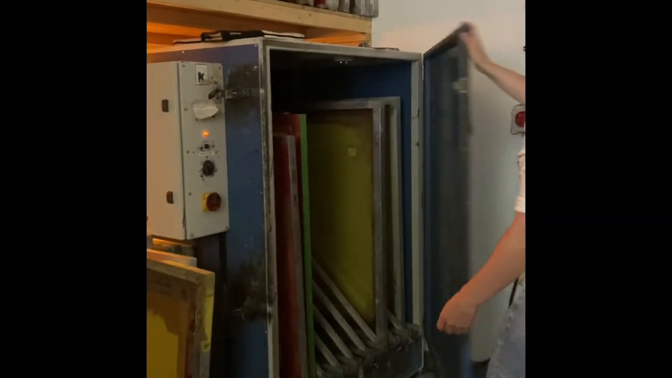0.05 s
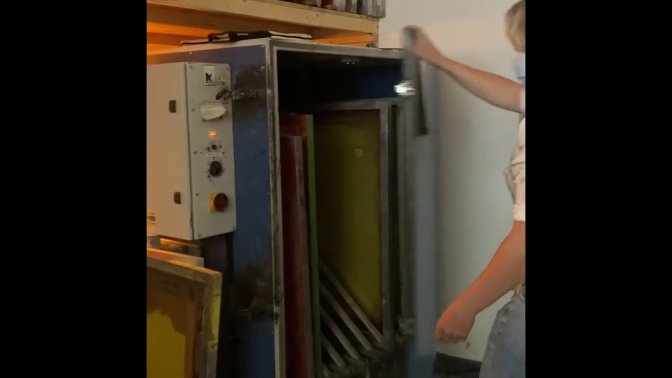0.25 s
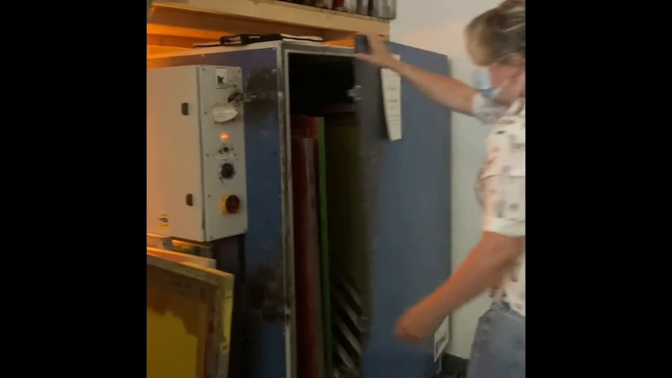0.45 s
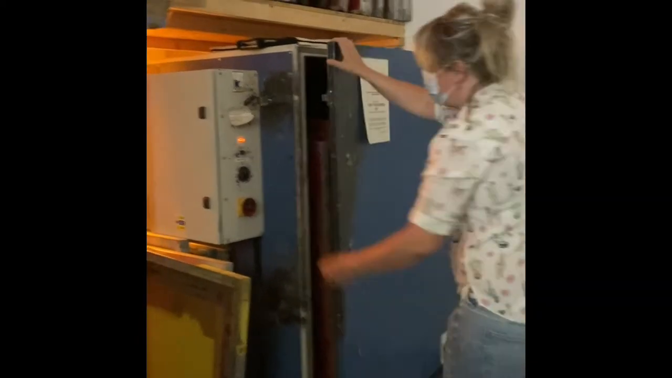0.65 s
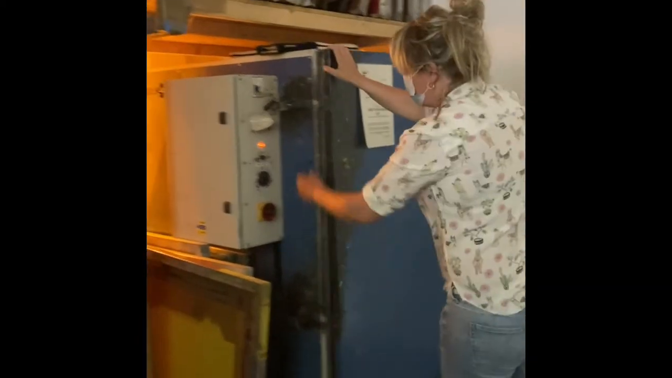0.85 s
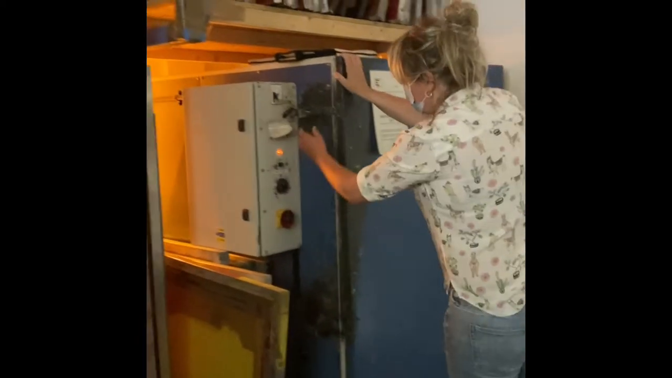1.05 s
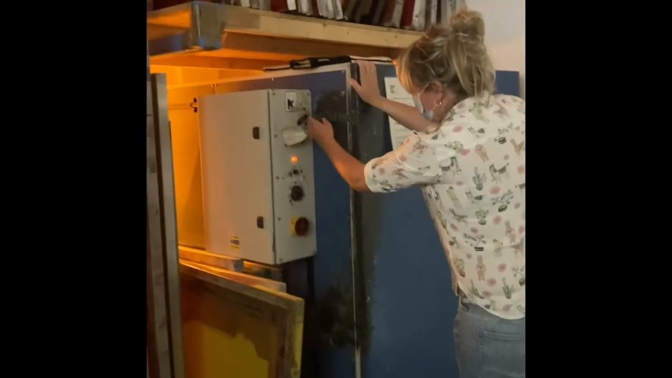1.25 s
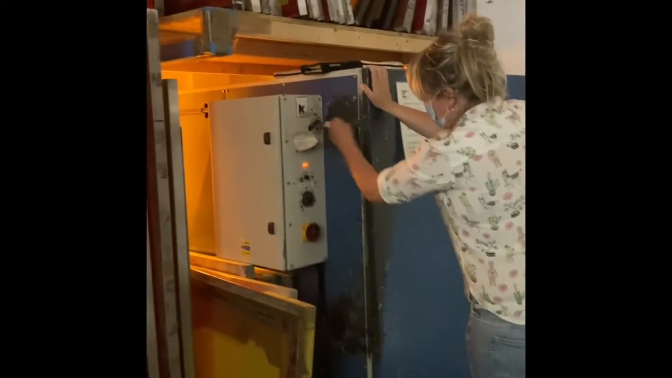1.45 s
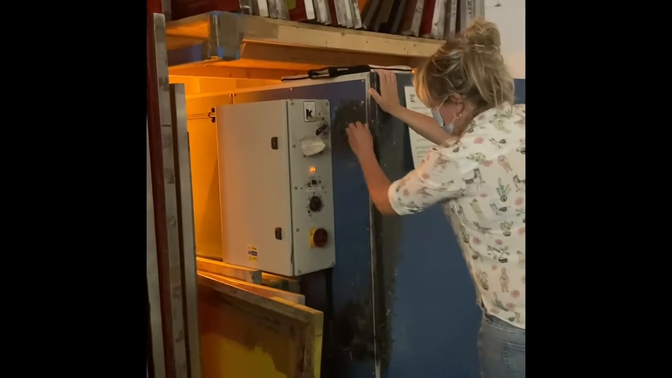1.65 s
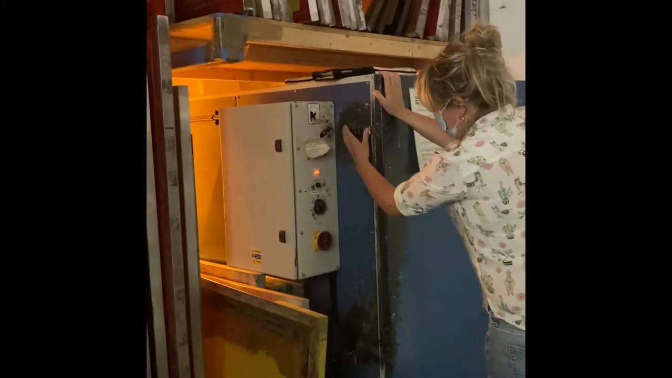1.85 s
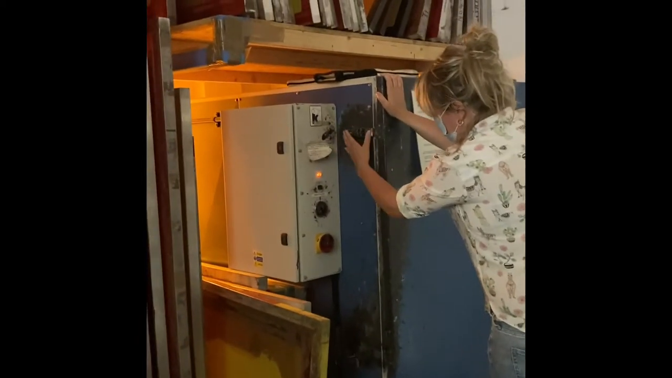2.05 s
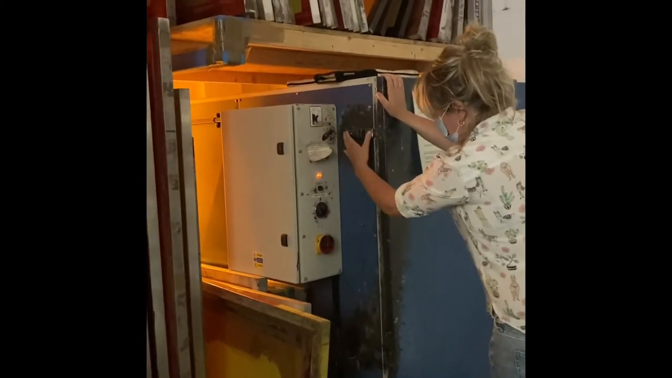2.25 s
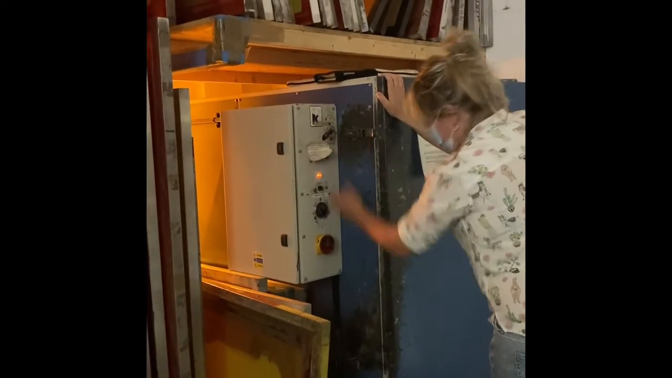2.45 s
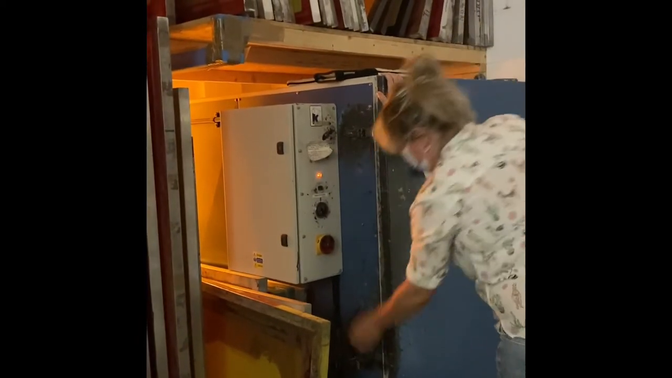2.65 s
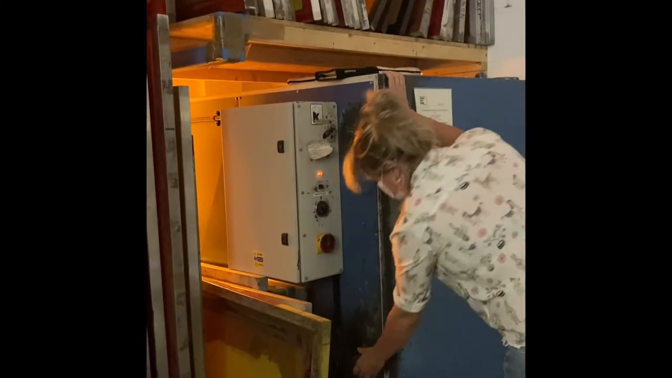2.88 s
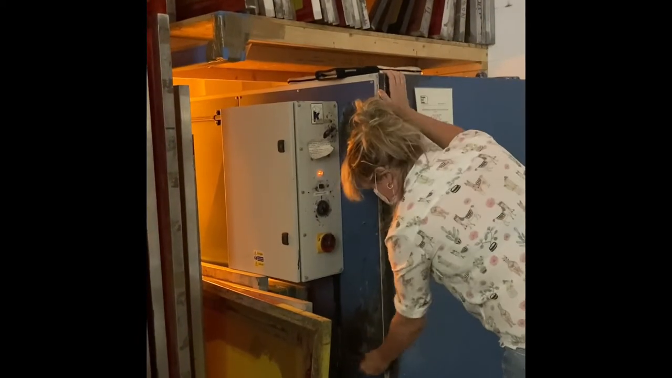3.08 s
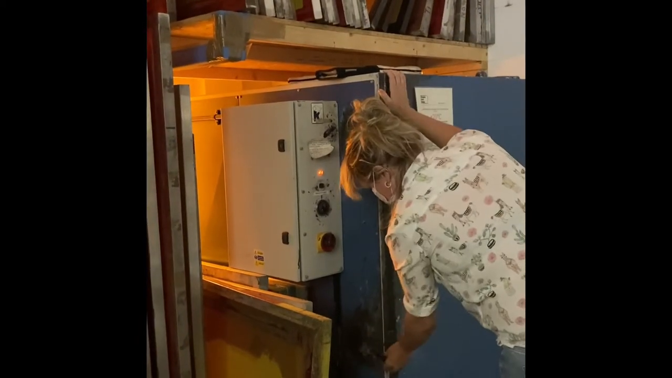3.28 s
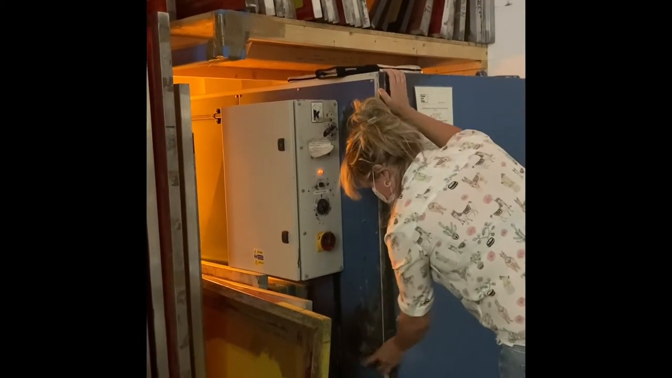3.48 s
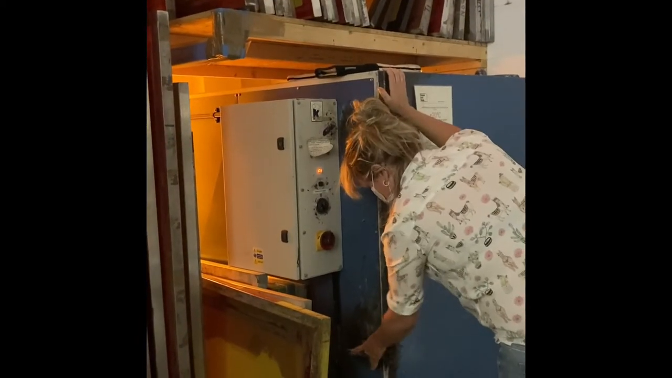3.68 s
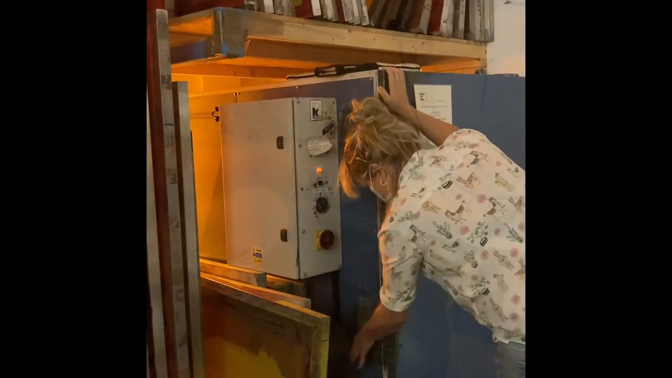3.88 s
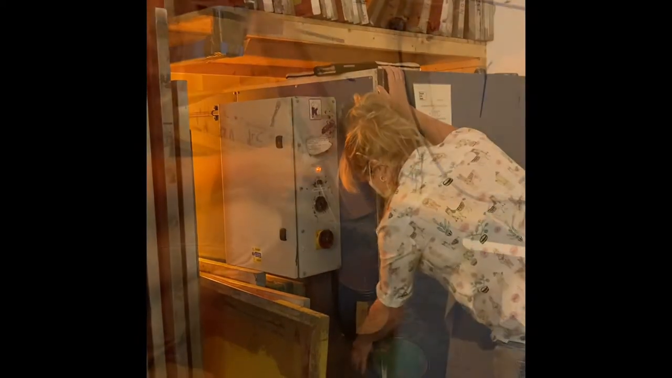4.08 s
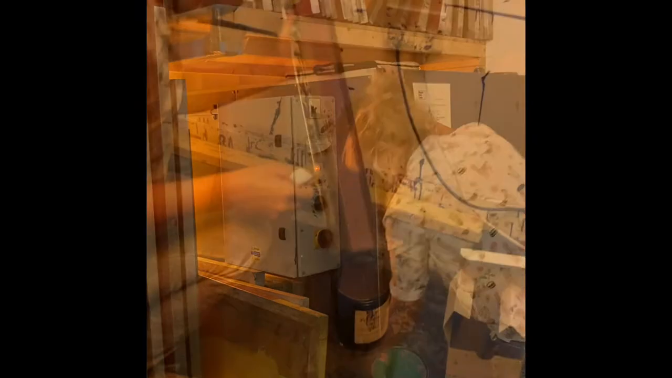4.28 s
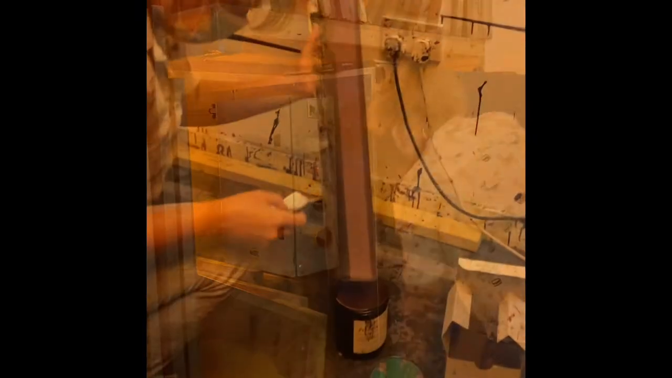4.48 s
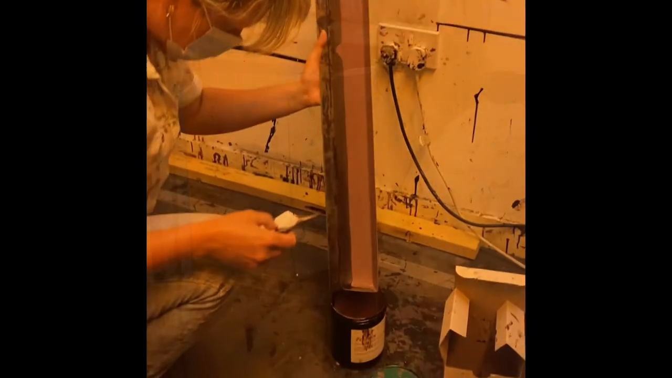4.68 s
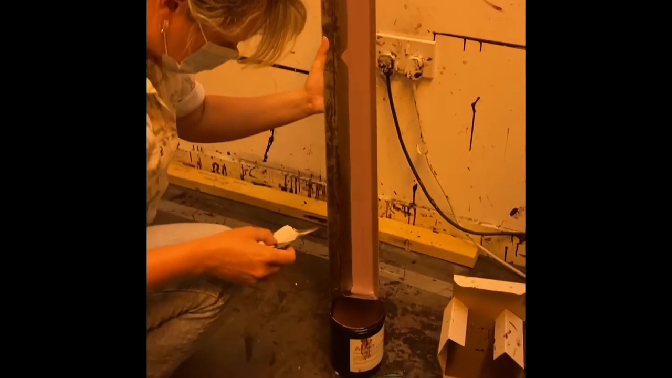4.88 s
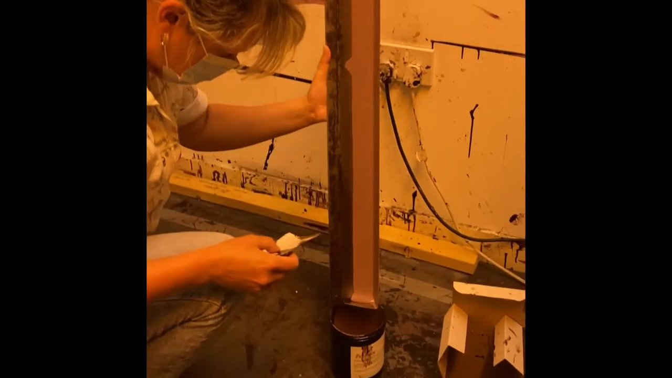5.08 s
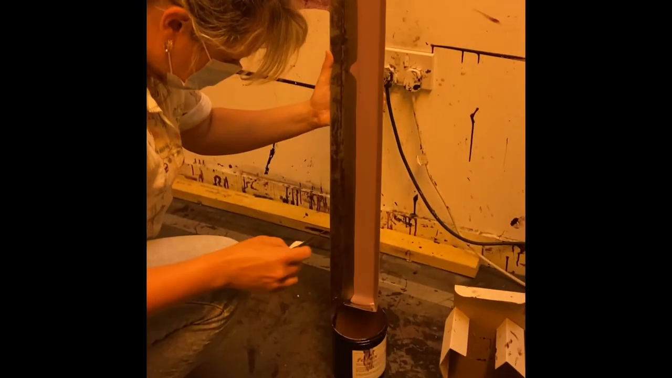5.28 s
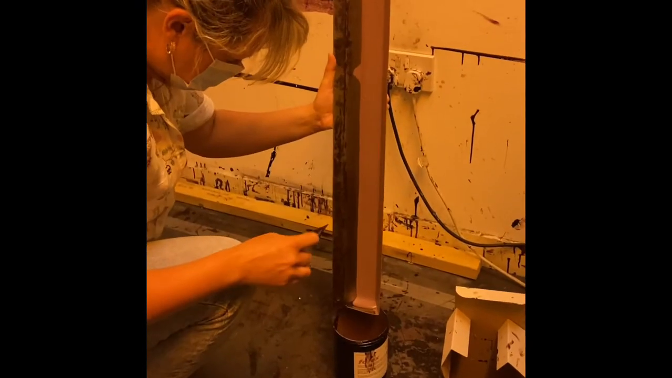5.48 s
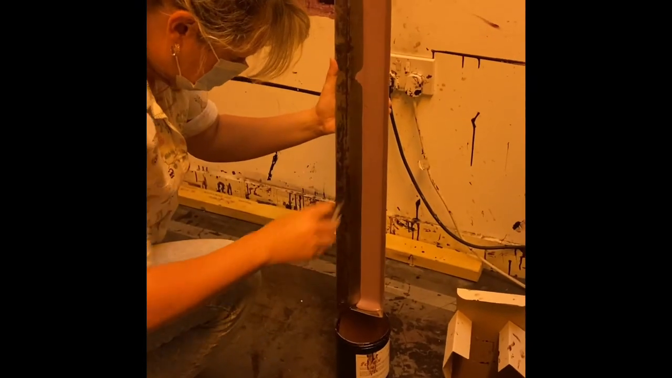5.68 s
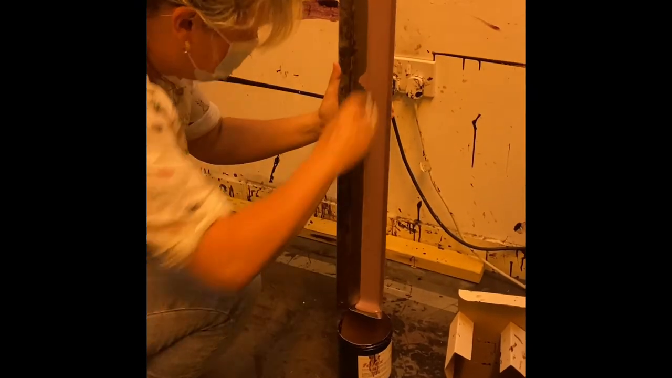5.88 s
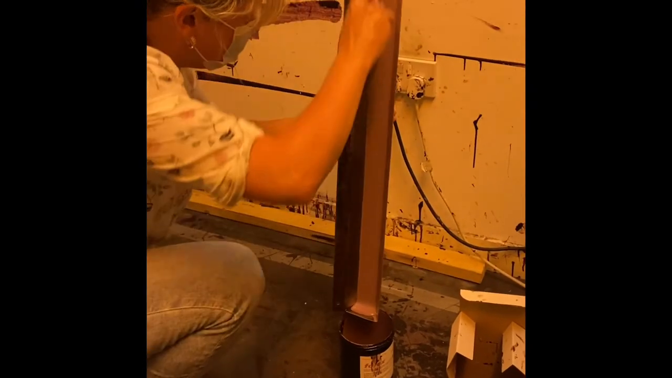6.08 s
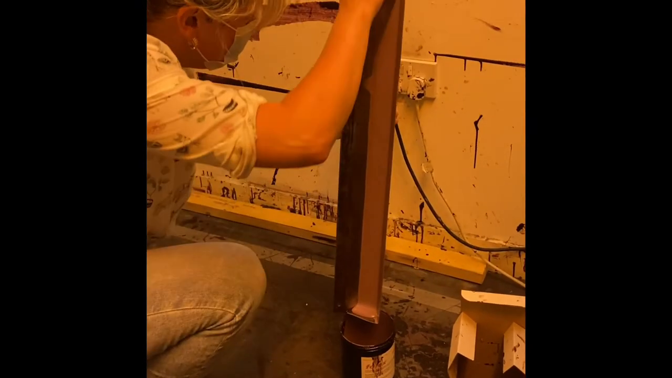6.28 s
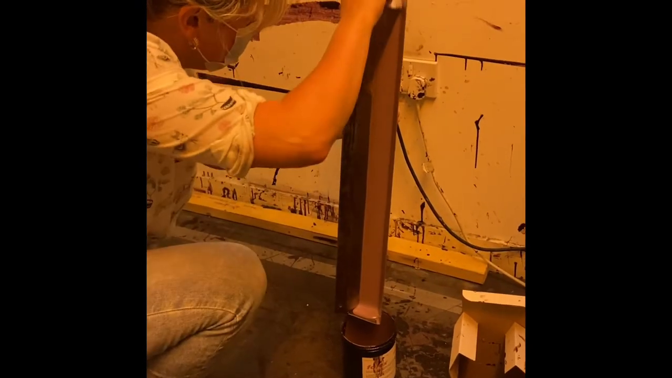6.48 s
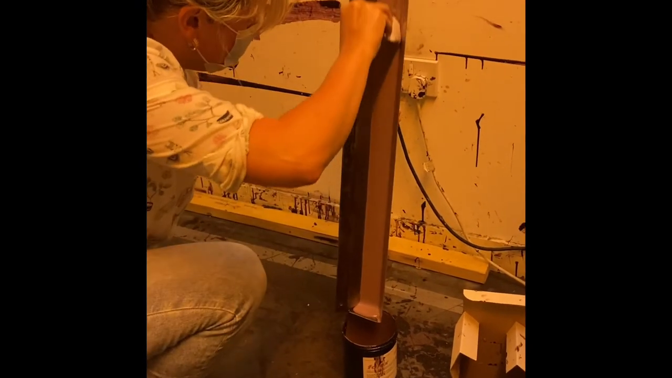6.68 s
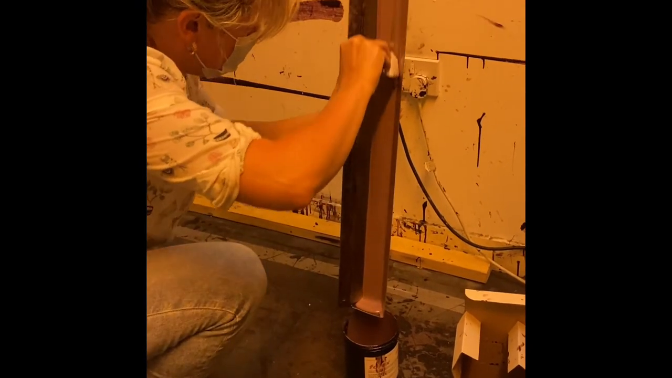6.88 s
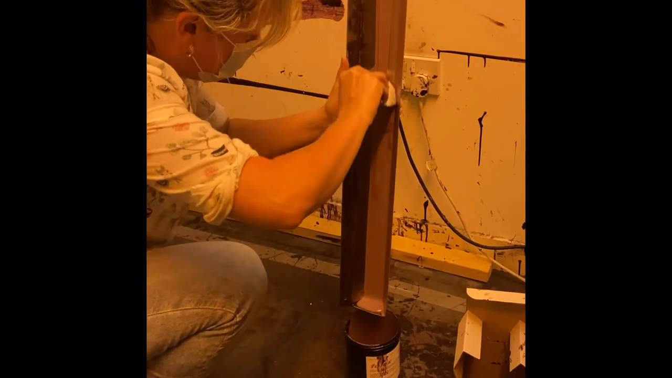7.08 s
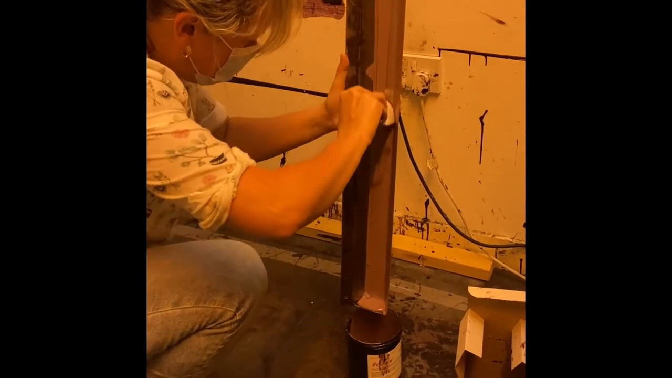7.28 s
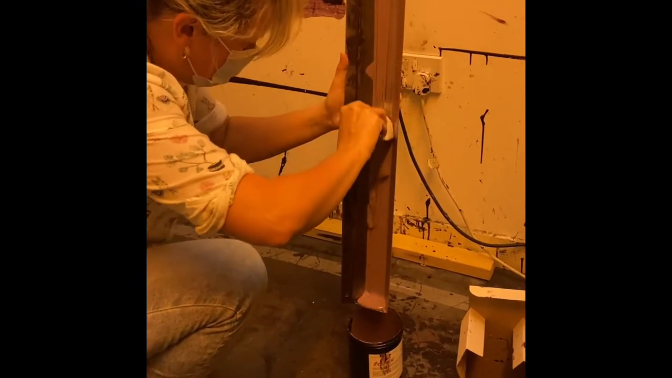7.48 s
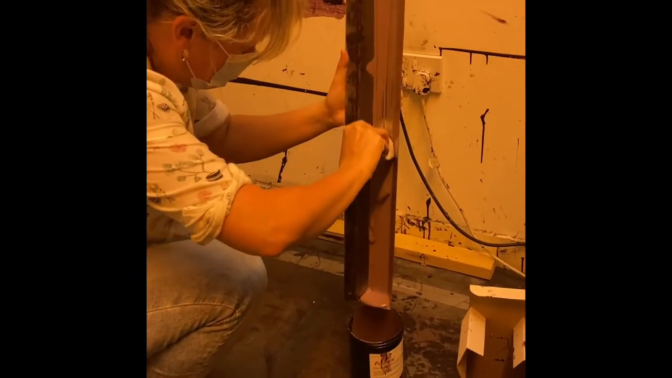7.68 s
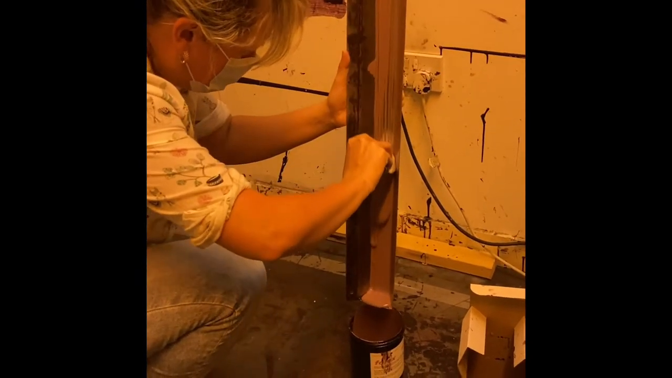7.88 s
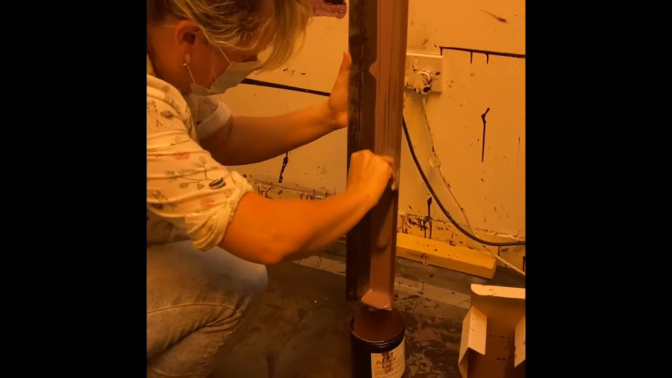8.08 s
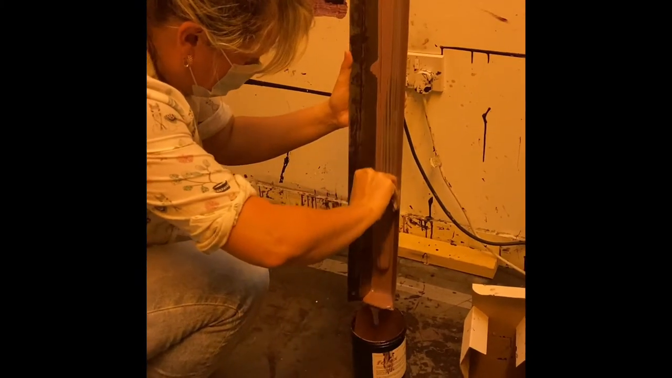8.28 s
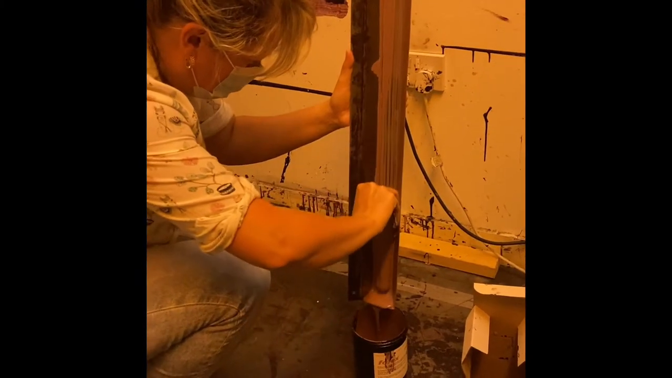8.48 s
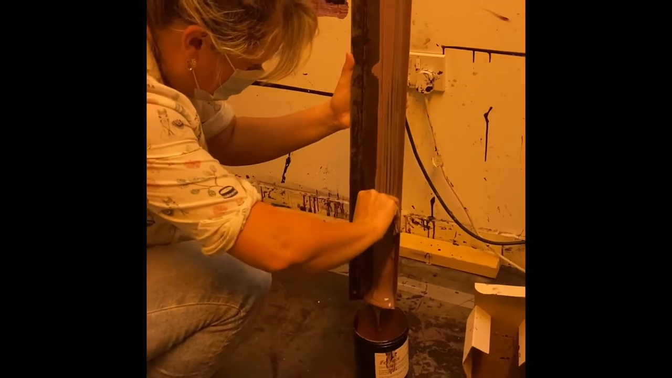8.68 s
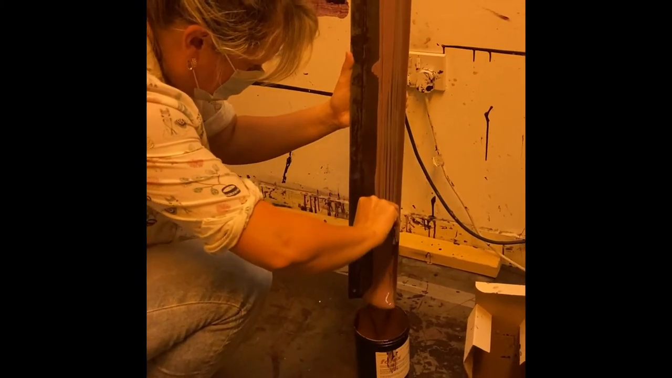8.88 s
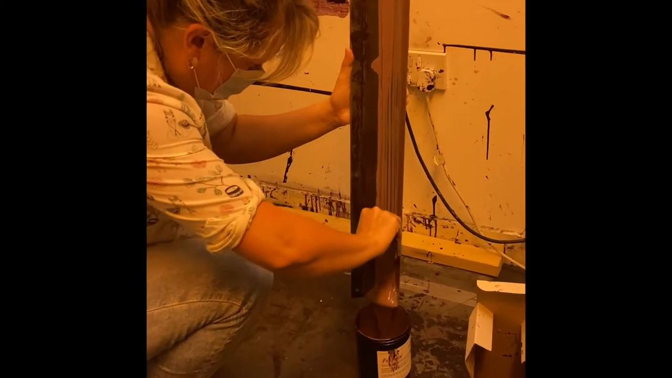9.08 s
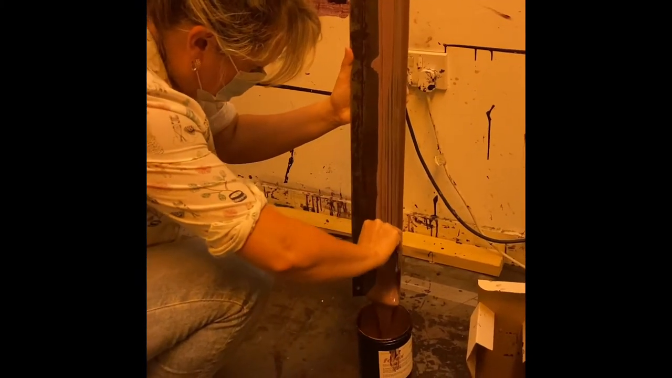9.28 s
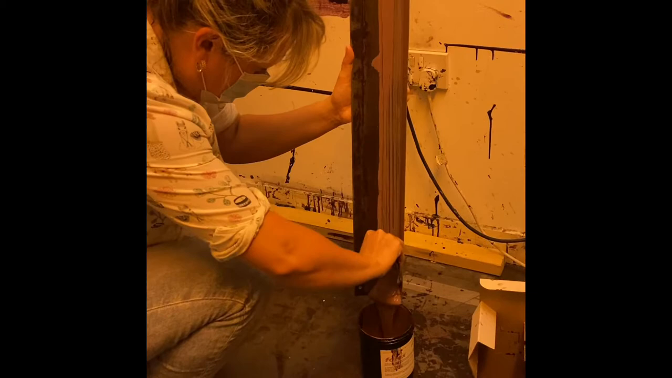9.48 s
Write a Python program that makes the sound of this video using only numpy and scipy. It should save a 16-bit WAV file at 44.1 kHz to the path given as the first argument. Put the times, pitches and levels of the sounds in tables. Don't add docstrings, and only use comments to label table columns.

```python
import sys
import numpy as np
from scipy import signal
from scipy.fft import rfft, irfft, next_fast_len
from scipy.io import wavfile
from scipy.ndimage import uniform_filter1d

SR = 44100
rng = np.random.default_rng(int(sys.argv[2]) if len(sys.argv) > 2 else 0)


def transcribe(u):
    v = np.clip(np.atleast_2d(u).T, -1, 1)
    q = np.round(v * 32767).astype(np.int16)
    wavfile.write(sys.argv[1], SR, q)


def magnitude_from_level(level_db):
    exponent = np.asarray(level_db, float) / 20
    return 10 ** exponent


N = 420713
T = np.arange(N) / SR
SIZE = next_fast_len(N + SR, real=True)
HZ = np.maximum(np.arange(SIZE // 2 + 1) * SR / SIZE, 1)
DISSOLVE_S, DISSOLVE_LENGTH_S = 3.97, 0.85

# [start_s, hiss_db]
SWING = [
    (0.0, -28.5),
    (0.18, -35.5),
    (0.316, -30),
    (0.6, -31),
    (0.664, -31),
    (0.7, -33.5),
    (0.89, -36.5),
    (0.954, -37.5),
    (1.0, -50),
]
# [start_s, clack_db, hook_db, plate_db]
LOWER_LATCH = [
    (3.2488, -9.5, -24.5, -53),
    (3.2528, -8, -33, -35),
    (3.445, -23.5, -39.5, -51.5),
    (3.485, -25.5, -53, -38),
    (3.515, -42, -53, -37.5),
    (3.795, -12, -32, -22.5),
]
# [pitch_hz, likeness_0_to_1]
LIKENESS = [(100, .98), (250, .9), (400, .45), (600, .78), (1000, .78), (1600, .38), (2500, .25),
            (3500, .4), (4500, .6), (5300, .94), (5900, .92), (6500, .78), (7500, .85), (9000, .96),
            (11700, .97), (15500, .8)]
# [pitch_hz, lead_rad]
LEAD = [(0, 0), (300, .2), (520, -2.7), (2100, -1.8), (2840, -3.4), (5600, -3.1), (7300, -1.3), (7670, -.2),
        (8870, .1), (11200, 2.9), (12300, 3.3), (14100, 6.1), (16500, 6.2)]
# [pitch_hz, lean_db]
LEAN = [(60, 1.5), (150, 9), (380, 8), (950, -1), (2380, -0.5), (5980, 1), (15000, 0.5)]
FIRST = (LIKENESS, LEAD, LEAN)


def in_time(rows):
    s, *columns = np.transpose(rows)
    return [np.interp(T, s, column) for column in columns]


def at_hz(points, hz=HZ):
    f, v = np.transpose(points)
    return np.interp(np.log(hz), np.log(np.maximum(f, 1)), v)


def drift(rate):
    count = int(N / SR * rate) + 2
    return np.interp(T * rate, np.arange(count), rng.standard_normal(count))


def gate(start, end, edge):
    return np.clip(np.minimum(T - start, end - T) / edge, 0, 1)


def ring(clicks, hz, t60):
    r = magnitude_from_level(-60 / (t60 * SR))
    w = 2 * np.pi * hz / SR
    return signal.lfilter([0, np.sin(w)], [1, -2 * r * np.cos(w), r * r], clicks + 1e-18)


def ports(pair, room, colour_db=0):
    likeness, lead, lean = room
    lead_hz, lead_rad = np.transpose(lead)
    alike = at_hz(likeness)
    same = np.sqrt((1 + alike) / 2) * pair[0]
    apart = np.sqrt((1 - alike) / 2) * pair[1]
    turn = magnitude_from_level(at_hz(lean) / 2) * np.exp(.5j * np.interp(HZ, lead_hz, lead_rad))
    both = np.array([(same + apart) * turn, (same - apart) / turn])
    return irfft(magnitude_from_level(colour_db) * both, SIZE)[:, :N]


def air(spectrum, room):
    real, imaginary = rng.standard_normal((2, 2, len(HZ)))
    both = ports(real + 1j * imaginary, room, at_hz(spectrum))
    return both / np.std(both.mean(0))


def slips(rows, tone, wobble):
    glide = []
    for start, end, first_hz, last_hz, _ in rows:
        glide += [(start, first_hz), (end, last_hz)]
    hz, = in_time(glide)
    on = (T > rows[0][0]) & (T < rows[-1][1])
    phase = 2 * np.pi * np.cumsum((hz * (1 + wobble * drift(60)))[on]) / SR
    out = np.zeros(N)
    out[on] = sum(magnitude_from_level(db + 1.6 * drift(23.8)[on]) * np.sin(k * phase) for k, db in tone)
    return out * sum(magnitude_from_level(db) * gate(start, end, 0.016) for start, end, _, _, db in rows)


def fan(levels, low, high, room, patchy_db):
    rumble_db, air_db, hum_db = levels
    mains_hz, blade_hz, blade_db = 100, 212.6, -10.5
    rumble = magnitude_from_level(rumble_db + patchy_db * drift(7)) * air(low, room)
    hiss = magnitude_from_level(air_db + patchy_db * drift(7.1)) * air(high, room)
    blade = magnitude_from_level(blade_db + 1.5 * drift(6.6)) * np.sin(2 * np.pi * blade_hz * T + 0.17 * drift(3.7))
    hum = np.sqrt(2) * magnitude_from_level(hum_db) * (np.sin(2 * np.pi * mains_hz * T) + blade)
    return rumble + hiss + hum * magnitude_from_level(at_hz(room[2], 110) / 2 * np.array([[1], [-1]]))


def gap_whistle():
    # [start_s, pitch_hz]
    gap_pitch = [
        (0.0, 8680),
        (0.28, 8430),
        (0.598, 9400),
        (1.0, 8670),
    ]
    low_pass = signal.butter(2, 400, fs=SR, output="sos")
    narrow = signal.sosfilt(low_pass, rng.standard_normal((2, N)))
    phase = 2 * np.pi * np.cumsum(in_time(gap_pitch)[0]) / SR
    band = narrow[0] * np.cos(phase) + narrow[1] * np.sin(phase)
    return band / np.std(band)


def swing():
    # [pitch_hz, level_db]
    seal_colour = [(3600, -9.5), (5000, -11.5), (6500, -4.5), (7500, -3.5), (8700, 0), (10500, 0.5),
                   (12000, -0.5), (14500, -8.5), (16000, -31.5)]
    # [pitch_hz, level_db]
    scrape_colour = [(300, -35.5), (600, -18), (1000, -6.5), (1500, -7.5), (2100, -6.5), (2800, 2),
                     (3050, -2.5), (3400, -21), (4300, -2.5), (5000, -21), (7000, -41)]
    # [pitch_hz, likeness_0_to_1]
    seal_likeness = [(100, .98), (3000, .3), (4200, .65), (5000, .95), (6000, .98), (6600, .8),
                     (11700, .98), (15500, .8)]
    # [start_s, level_db, length_s]
    finger_rubs = [
        (1.195, -67, .03),
        (1.329, -62, .02),
        (1.417, -56.5, .1),
        (1.528, -48, .02),
        (1.545, -46.5, 0.01),
    ]
    room = (seal_likeness, LEAD, LEAN)
    rubs = sum(magnitude_from_level(db) * gate(s, s + length, .008) for s, db, length in finger_rubs)

    hiss_db = in_time(SWING)[0] - 97.5 * np.maximum(T - SWING[-1][0], 0)
    hiss_level = (magnitude_from_level(hiss_db) + rubs) * magnitude_from_level(0.5 + 0.51 * drift(40))
    hiss = hiss_level * (air(seal_colour, room) + magnitude_from_level(-1) * gap_whistle())

    spacing_hz, uneven_db = 45, 5.0
    grid = np.arange(300, 7000, spacing_hz)
    modes = at_hz(scrape_colour, grid) + uneven_db * rng.standard_normal(len(grid))
    sheet = np.c_[grid, np.r_[-60, modes[1:-1], -60]]
    scrape_db = -42.5 - 70.5 * np.maximum(T - .88, 0)
    scrape_level = (magnitude_from_level(scrape_db) + magnitude_from_level(-7) * rubs) * magnitude_from_level(1.8 * drift(12))
    return hiss + scrape_level * air(sheet, room)


def cabinet_levels():
    # rumble_db, air_db, hum_db
    steady = (-41, -57, -43.5)
    # [peak_s, gain_db]
    shudders = [
        (1.3, 7.8),
        (1.9, 2.7),
        (3.9, 3.7),
    ]
    rise_s, fall_s = 0.44, 0.95
    shudder_db = sum(np.interp(T, [s - rise_s, s, s + fall_s], [0, db, 0]) for s, db in shudders)
    is_open = np.clip((SWING[-1][0] - T) / .3, 0, 1)
    return steady[0] + shudder_db + 0.5 * is_open, steady[1] + 3.5 * is_open, steady[2]


def cabinet_fan():
    # [pitch_hz, level_db]
    rumble_colour = [(20, -20.5), (45, 3), (62, 1), (80, -3), (130, -0.5), (220, -2), (300, -5), (400, -16),
                     (700, -13.5), (1000, -20.5), (1500, -44.5)]
    # [pitch_hz, level_db]
    air_colour = [(600, -10.5), (1000, -3.5), (1400, -2.5), (2000, -1), (2500, -6.5), (3000, -10.5),
                  (4000, -13), (5500, -21), (7500, -33.5), (9500, -27), (13000, -40.5), (15500, -45.5),
                  (16500, -67)]
    # [pitch_hz, likeness_0_to_1]
    fan_likeness = [(100, .98), (250, .9), (400, .45), (800, .78), (1600, .38), (3000, .3), (5500, .7),
                    (9000, .95)]
    return fan(cabinet_levels(), rumble_colour, air_colour, (fan_likeness, LEAD, LEAN), patchy_db=1.74)


def whine():
    rung = ring(rng.standard_normal(N), 2010, .04)
    return magnitude_from_level(-67) * (T < DISSOLVE_S) * rung / np.std(rung)


def squeaks():
    # [start_s, end_s, first_slip_hz, last_slip_hz, level_db]
    creak = [
        (.18, .57, 569, 426, -45),
    ]
    hinge = [
        (.56, .8, 465.7, 460.6, -46.5),
        (.805, .95, 388.5, 395, -49),
    ]
    rubber = [
        (3.95, 4.05, 242, 185, -45),
    ]
    # [multiple, level_db]
    creak_tone = [(1, -25), (2, -17), (3, 1), (4, -15), (5, -9), (6, -8)]
    hinge_tone = [(1, -5), (2, 7.5), (3, -1.5), (4, -21), (5, -7.5), (6, -2)]
    rubber_tone = [(2, 3), (3, -6), (4, -23)]
    out = magnitude_from_level(2.5) * slips(creak, creak_tone, wobble=.005)
    out += slips(hinge, hinge_tone, wobble=0.0064)
    return out + magnitude_from_level(3) * slips(rubber, rubber_tone, wobble=.018)


def bumps():
    # [start_s, boom_db, panel_hz, panel_db]
    blows = [(.87, -49, 267, -34.5), (.93, -29, 208, -33.5), (.953, -27, 148, -24.5),
             (1.007, -18.5, 216.6, -27.5), (1.05, -22, 177.8, -22), (1.085, -28.5, 125.6, -25),
             (1.114, -20, 127, -20), (1.205, -26, 106.3, -19), (1.229, -19.5, 119.7, -23.5),
             (1.254, -23, 169.8, -27), (1.39, -31, 120, -30.5), (1.476, -33, 148.5, -33),
             (1.764, -32.5, 194, -31), (1.848, -38, 102.5, -37), (2.025, -47.5, 250, -37),
             (3.799, -36.5, 172.7, -29.5), (3.83, -38, 235, -30.5), (3.87, -41, 168.3, -29.5)]
    boom, out = np.zeros(N), np.zeros(N)
    click = np.r_[1., np.zeros(SR // 2)]
    for s, boom_db, panel_hz, panel_db in blows:
        i = round(s * SR)
        boom[i] = magnitude_from_level(boom_db + 4.5)
        out[i:i + len(click)] += magnitude_from_level(panel_db + 2.0) * ring(click, panel_hz, 0.32)
    out += ring(boom, 58.6, 0.24)
    out += magnitude_from_level(-13.5) * ring(boom, 284.6, 0.13)
    soft_band = signal.butter(3, [38, 330], "band", fs=SR, output="sos")
    return signal.sosfilt(soft_band, out)


def contact_rows():
    # [start_s, clack_db, hook_db, plate_db]
    upper_latch = [
        (1.017, -35.5, -40.5, -39),
        (1.5712, -10, -20, -26.5),
        (1.5766, -6, -34, -35.5),
        (1.7628, -10.5, -29.5, -20),
        (2.017, -47.5, -29.5, -30.5),
        (2.023, -4, -35, -29.5),
    ]
    # [start_s, clack_db]
    touches = [
        (1.183, -47.5),
        (1.206, -44),
        (1.334, -41.5),
        (1.5284, -41.5),
        (2.825, -39.5),
        (2.9291, -36.5),
        (3.0806, -32.5),
        (9.31, -39),
    ]
    rows = []
    for latch, against_plate_db in ((upper_latch, -4.5), (LOWER_LATCH, 2)):
        for s, clack, hook, plate in latch:
            hard_loss_db = .5 * max(clack + 12, 0)
            rows.append((s, clack, hook, plate, plate + against_plate_db - hard_loss_db))
    for s, clack in touches:
        rows.append((s, clack, clack - 15, clack - 21, clack - 13))
    return sorted(rows)


def latches():
    # [pitch_hz, level_db]
    clack_colour = [(4000, -20), (5500, -15.5), (6500, -8), (7600, -8.5), (8700, -0.5), (10500, -0.5),
                    (12000, -2), (14500, -10.5), (16000, -13), (17000, -61)]
    hook_colour = [(1800, -29), (2500, -7.5), (3000, -1), (3550, 3), (4200, -3), (5000, 1), (5800, 1.5),
                   (7500, -32.5)]
    plate_colour = [(600, -29.5), (950, -7), (1320, 3), (1500, -6), (1700, -1.5), (2000, -5), (2400, -5),
                    (3300, -31)]
    body_colour = [(120, -23.5), (250, 3.5), (500, -1), (680, 11.5), (900, -0.5), (1500, -7.5),
                   (3000, -29.5)]
    s, clack_db, hook_db, plate_db, body_db = np.transpose(contact_rows())
    when = rng.gamma(1.4, .7, (len(s), 80))
    height = rng.normal(0, 1 / np.sqrt(80), (len(s), 80))
    loose = (s > LOWER_LATCH[1][0]) & (s < DISSOLVE_S) & (clack_db < -11)
    length_s = np.where(loose, .006, .0036)

    def rattle(level_db, stretch, colour):
        clicks = np.zeros(N)
        at = (s[:, None] + when * stretch * length_s[:, None]) * SR
        np.add.at(clicks, np.minimum(at.astype(int), N - 1), height * magnitude_from_level(level_db)[:, None])
        return rfft(clicks, SIZE) * magnitude_from_level(at_hz(colour))

    steel = rattle(clack_db + 28.0, 0.98, clack_colour) + rattle(hook_db + 38.0, 1.8, hook_colour)
    return steel + rattle(plate_db + 38, 3.5, plate_colour) + rattle(body_db + 34, 3.9, body_colour)


def workshop(spectrum, wet_db):
    # [pitch_hz, t60_s]
    decay = [(250, 1), (800, 0.51), (2000, 0.44), (5500, 0.41), (14000, 0.091)]
    t = T[:SR]
    tails = np.zeros((2, SR))
    for hz in 62.5 * 2 ** np.arange(0, 8.1, .5):
        band = signal.butter(1, [hz / 2 ** .25, hz * 2 ** .25], "band", fs=SR)
        tails += signal.lfilter(*band, rng.standard_normal((2, SR))) * magnitude_from_level(-60 * t / at_hz(decay, hz))
    tails *= magnitude_from_level(wet_db) * (1 - np.exp(-t / 0.00044))
    tails[:, 0] = 1, .5
    return ports(spectrum * rfft(tails, SIZE), FIRST)


def extractor_levels():
    # rumble_db, air_db, hum_db
    steady = (-35.5, -47.3, -33)
    settle_db = -1 * np.clip(1 - (T - DISSOLVE_S - DISSOLVE_LENGTH_S) / 0.54, 0, 1)
    gust_db = 1.8 * np.exp(-.5 * ((T - 5.13) / .07) ** 2)
    return [db + settle_db + gust_db for db in steady]


def extractor():
    # [pitch_hz, level_db]
    rumble_colour = [(20, -40), (45, -11), (60, -3), (80, -6.5), (125, 3.5), (155, -5.5), (190, 3),
                     (250, -1), (295, -6.5), (355, 0), (450, -11.5), (680, -14), (1000, -28.5), (1500, -45)]
    # [pitch_hz, level_db]
    air_colour = [(600, -3.5), (1000, 2), (1500, 0), (2000, -1.5), (2800, -3), (3300, -8), (4300, -9.5),
                  (5600, -14.5), (7500, -18), (9000, -18), (11000, -22), (13000, -32.5), (14800, -39),
                  (15500, -63)]
    # [pitch_hz, likeness_0_to_1]
    next_likeness = [(100, .99), (250, .96), (400, .86), (600, .76), (1000, .65), (2500, .57), (3500, .75),
                     (4500, .45), (5500, .73), (7500, .85), (9000, .89), (12500, .79), (15500, .65)]
    # [pitch_hz, lead_rad]
    next_lead = [(0, 0), (340, .7), (860, 3.3), (3790, 3.6), (4310, 1.7), (5170, 2.9), (7320, 5.0),
                 (7670, 6.0), (8870, 6.3), (11100, 9.3), (13000, 9.7), (13900, 12.6), (16500, 12.6)]
    # [pitch_hz, lean_db]
    next_lean = [(60, 2), (150, 1), (380, 4), (950, 1), (2380, -0.5), (5980, 0.5), (15000, -0.5)]
    room = (next_likeness, next_lead, next_lean)
    return fan(extractor_levels(), rumble_colour, air_colour, room, patchy_db=0.4)


def scene():
    contacts = workshop(latches() + rfft(whine(), SIZE), wet_db=-32.5)
    door = ports(rfft(bumps() + squeaks(), SIZE) * [[1], [.9]], FIRST)
    mix = np.clip((T - DISSOLVE_S) / DISSOLVE_LENGTH_S, 0, 1)
    return contacts + door + swing() + (1 - mix) * cabinet_fan() + mix * extractor()


def warble(x):
    # [pitch_hz, spread_db]
    flutter = [(300, 0), (700, 4.5), (3000, 4.5), (5000, 4), (9000, -2)]
    hz, _, cells = signal.stft(x, SR, nperseg=1024)
    patches = uniform_filter1d(rng.standard_normal(cells.shape[1:]), size=2, axis=1) * np.sqrt(2)
    spread_db = at_hz(flutter, np.maximum(hz, 1))[:, None]
    return signal.istft(cells * magnitude_from_level(spread_db * patches), SR, nperseg=1024)[1][:, :N]


def band_limit(x):
    return signal.sosfilt(signal.butter(12, 17000, fs=SR, output="sos"), x)


def record(dry):
    high_pass = signal.butter(3, 36, "high", fs=SR, output="sos")
    thin = signal.sosfilt(high_pass, dry)
    mix = 0.85 * np.tanh(warble(thin) / 0.97)
    return band_limit(mix)


dry = scene()
out = record(dry)
transcribe(out)
```